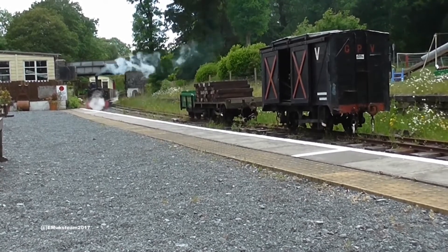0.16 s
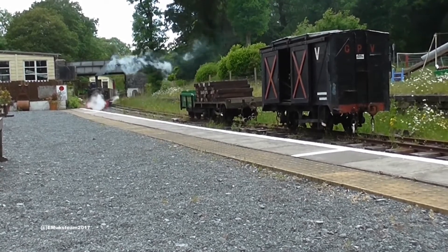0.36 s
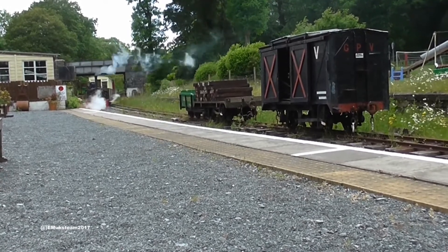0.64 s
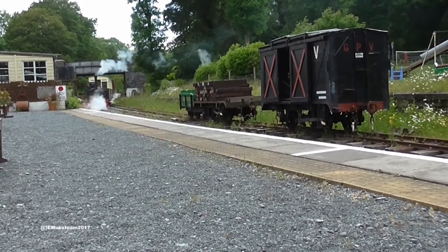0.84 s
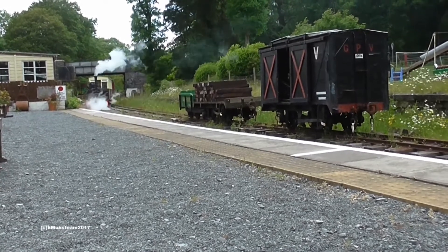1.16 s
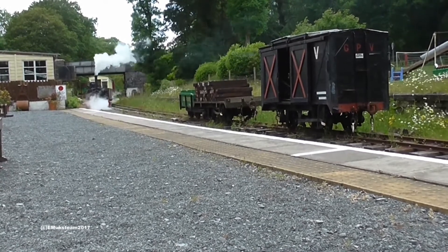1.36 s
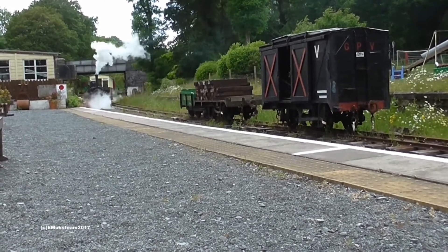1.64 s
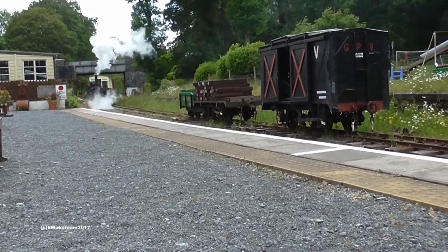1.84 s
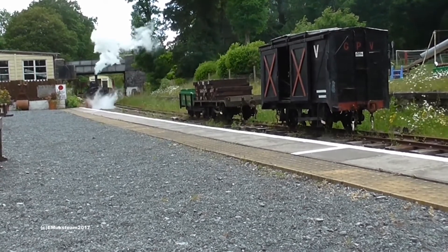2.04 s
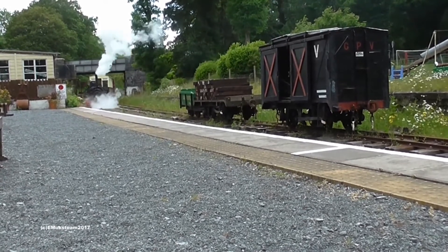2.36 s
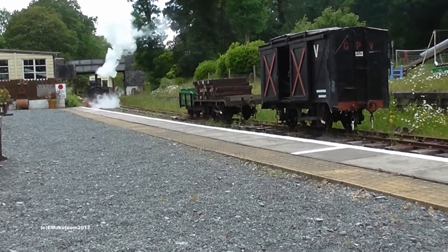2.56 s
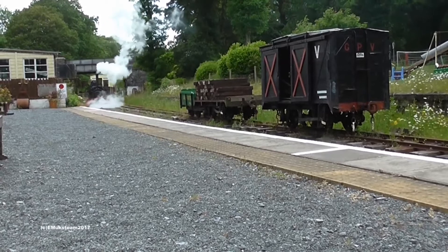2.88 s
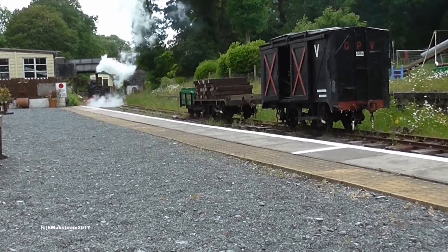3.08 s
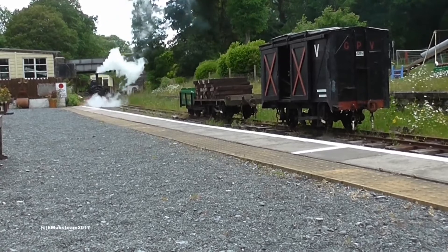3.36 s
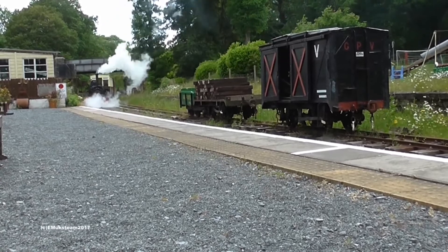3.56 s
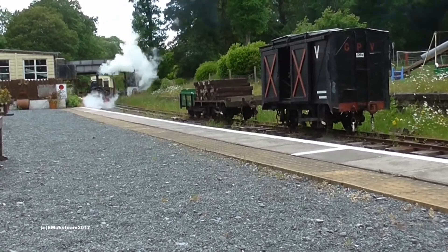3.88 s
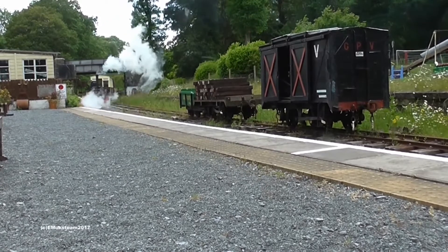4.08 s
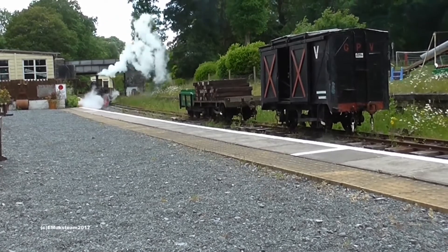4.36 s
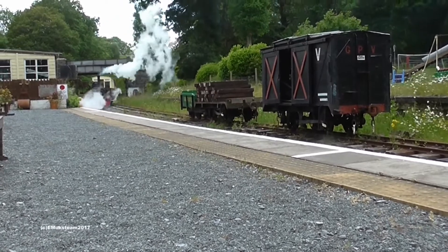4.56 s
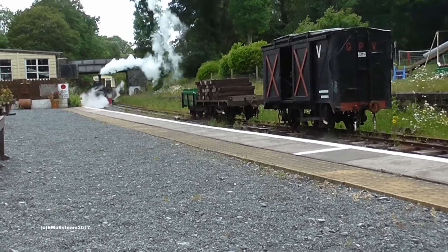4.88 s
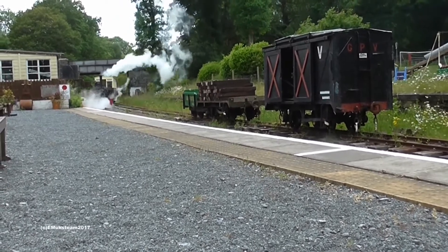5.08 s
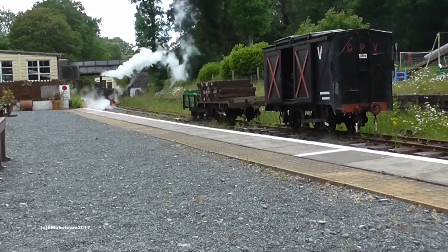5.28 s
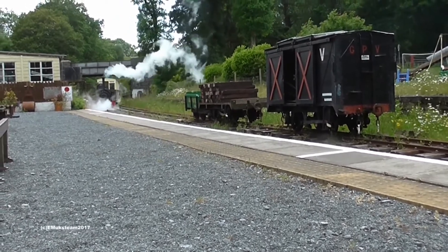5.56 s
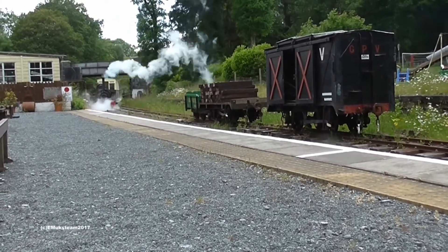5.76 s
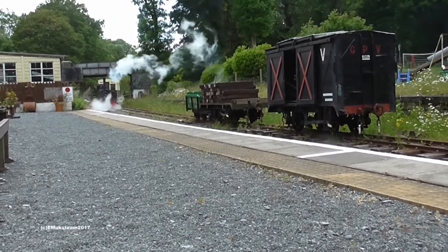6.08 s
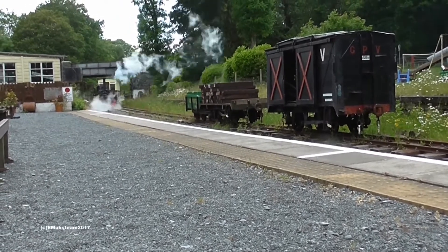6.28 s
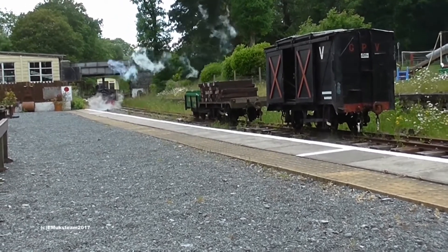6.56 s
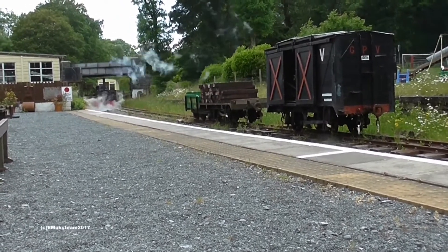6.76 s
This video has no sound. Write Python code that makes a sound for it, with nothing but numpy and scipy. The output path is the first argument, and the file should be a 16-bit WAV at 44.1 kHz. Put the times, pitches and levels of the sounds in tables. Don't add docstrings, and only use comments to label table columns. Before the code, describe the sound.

Heavy wind rumble and sharp buffeting slaps open the scene, uneven between left and right, over a distant steady rush of escaping steam. The wind calms and the hiss stands clearer, shimmering with airy pipe-like tones and a soft chimney drone. Small gusts return before the valve closes around 5.5 seconds; the hiss drops away with a short echo into quiet outdoor air, with a few low wind bumps at the end.

```python
import sys
import numpy as np
from scipy import signal
from scipy.fft import rfft, irfft, next_fast_len
from scipy.io import wavfile
from scipy.ndimage import uniform_filter1d, map_coordinates

SR = 44100
rng = np.random.default_rng(int(sys.argv[2]) if len(sys.argv) > 2 else 0)


def log_audio(samples):
    frames = np.atleast_2d(samples).T
    limited = np.clip(frames, -1, 1)
    pcm = np.round(limited * 32767).astype(np.int16)
    wavfile.write(sys.argv[1], SR, pcm)


def natural_amplitude(level_db):
    exponent = np.asarray(level_db, float) / 20
    return 10 ** exponent


N = 305613
T = np.arange(N) / SR

# time in seconds, level in dB, clearness of the air in dB.
JET_FLOW = [(0.0, -33, 4), (0.07, -30.5, 2), (0.24, -33, 1.5), (0.33, -28.5, -4), (0.86, -31, -3),
            (1.18, -31.5, 1), (1.42, -31, -0.5), (1.46, -30.5, 0), (3.14, -31.5, -3), (3.31, -28.5, -4),
            (3.73, -30.5, -0.5), (3.83, -29, -2.5), (3.91, -31, 4), (4.05, -31, -1), (4.78, -31.5, -0.5),
            (5.1, -30.5, -4), (5.25, -29.5, -4), (5.42, -31.5, -3.5)]
# centre in Hz, width in Hz.
JET_REGIONS = [
    (9500, 4500),
    (5800, 2000),
    (3850, 1250),
    (1300, 650),
]
# dB above its level, share of the clearness,
# echo in dB, sinking of the echo in dB per second.
REGION_RESPONSE = [
    (1, 1.3, 3, 61),
    (0, 0.48, -1.5, 35.5),
    (-4, 0.24, 2, 31),
    (-10.5, 0.034, -1, 16),
]
# frequency in Hz, density in dB per Hz.
NOZZLE_SPECTRUM = [(500, -75), (900, -35.5), (1600, -31.5), (1900, -23.5), (3000, -19.5), (3400, -7.5),
                   (4600, -3.5), (5200, -2.5), (6800, -1.5), (8000, -3.5), (10100, -7.5), (12000, -15),
                   (14200, -23), (15500, -27)]
# frequency in Hz, width in Hz, lift in dB.
PATH_COLOUR = [(3780, 200, 2), (4750, 200, -3), (5450, 400, 3), (7750, 200, -4)]
# time in seconds, fall of the direct sound in dB per second.
VALVE_SHUT = (5.468, 130)

# resonance in Hz, width in Hz.
PIPE_RESONANCES = [(1860, 124), (2185, 195), (2685, 440), (3020, 530)]
PIPE_REST_DB = [-48, -43, -44, -50.5]
# time in seconds, length in seconds, peak in dB.
PIPE_SWELLS = [
    [(.95, 0.33, -40.5), (1.65, 0.15, -40), (1.92, 0.14, -36.5), (2.72, 0.19, -39.5), (3.3, 0.11, -38),
     (3.63, 0.06, -38.5), (4.52, 0.13, -38), (4.96, .12, -38)],
    [(.45, .25, -40.5), (.95, 0.15, -35.5), (1.67, 0.12, -30.5), (2.15, 0.32, -38), (2.5, 0.1, -34.5),
     (3.2, 0.073, -38.5), (3.8, 0.16, -35.5), (4.4, 0.29, -41), (4.8, 0.11, -30)],
    [(.36, 0.17, -37), (.96, 0.052, -42), (1.52, 0.39, -36), (2.03, 0.29, -32.5), (2.72, 0.12, -33),
     (3.4, 0.18, -37), (3.98, 0.25, -35), (4.97, 0.13, -33.5), (5.28, 0.14, -33)],
    [(.27, 0.2, -38.5), (4.08, 0.17, -34), (4.93, 0.14, -32), (5.3, 0.097, -36)],
]
# level in dB, sinking in dB per second.
PIPE_ECHO = (-7, 35)

# time in seconds, centre in Hz, length in seconds,
# width in Hz, lift in dB.
FOCUSED_GLINTS = [(0.105, 6500, 0.12, 904, 2.5), (0.344, 3770, 0.13, 200, 5), (1.385, 5650, 0.061, 250, 11),
                  (1.79, 5000, 0.12, 200, 9), (2.003, 3770, 0.19, 450, 5.5), (3.243, 3680, 0.071, 200, 8),
                  (3.826, 5450, 0.06, 300, 11.5), (3.85, 6200, .06, 300, 9.5), (5.11, 6100, .05, 200, 10),
                  (5.405, 3370, 0.052, 300, 12.5), (.47, 5700, 0.12, 400, -2), (.85, 2300, 0.19, 150, 1.5),
                  (1.45, 6700, 0.25, 300, 4), (3.2, 3100, 0.27, 200, 6), (3.4, 2820, .15, 130, -6),
                  (4.297, 2800, 0.11, 300, 5), (4.506, 2450, .1, 200, 6), (4.9, 2820, .1, 150, -10),
                  (5.56, 3100, 0.088, 600, -4), (4.71, 9000, 0.051, 4000, -5.5)]
# time in seconds, centre in Hz, length in seconds,
# lift in dB, drift in Hz per second.
PATH_RIDGES = [(.08, 8900, .08, 1, 0), (.1, 6250, 0.088, 1.5, -500), (0.123, 6800, .07, 5, 1000),
               (.2, 8600, .05, 11, 0), (.33, 5550, .07, 5, 0), (.6, 6300, 0.14, 4, -500),
               (1.0, 2600, .12, 7, 0), (1.18, 5550, 0.15, 4.5, 0), (1.302, 6700, .1, 3, 0),
               (1.467, 2750, 0.056, 3, 0), (1.603, 7400, 0.063, 6, 300), (1.78, 4450, 0.055, 12, 0),
               (1.82, 2420, .1, 0, 0), (1.93, 5200, 0.055, 8, 0), (1.947, 7550, .05, 16, 0),
               (1.996, 2190, 0.072, 5, 0), (2.1, 3440, 0.17, 6, -300), (2.096, 4250, 0.046, 5, 0),
               (2.2, 2670, 0.13, 2, 0), (2.5, 6500, 0.11, 9, 0), (3.297, 5540, .1, 2.5, 1500),
               (3.62, 5560, 0.048, 8, 0), (3.69, 1980, 0.033, 9, 3000), (3.924, 2650, 0.041, 8, 1000),
               (3.98, 5350, 0.087, 3.5, 500), (4.02, 3520, .04, 8, 0), (4.03, 2970, .08, 4, 1500),
               (4.097, 4170, .05, 7, 0), (4.134, 5340, 0.033, 6, 0), (4.3, 2200, 0.043, 8, 0),
               (4.55, 6900, 0.083, 7, 0), (4.92, 6800, 0.071, 5, 500), (4.97, 2640, .06, 3, 0),
               (5.25, 2650, 0.042, 3, 0), (5.173, 6600, 0.065, 10, 3000), (3.87, 6200, .05, 2, 3000),
               (.93, 2220, 0.034, 8.5, 0), (3.38, 1870, 0.091, -1, 0), (5.38, 3350, .06, -3, 0),
               (4.95, 3050, .08, -4, 0)]
# time in seconds, centre in Hz, length in seconds, lift in dB.
AIR_POCKETS = [(.3, 4800, 0.14, -1), (.5, 9500, 0.093, 2), (1.05, 1050, .12, -5), (1.1, 2450, 0.084, -1),
               (1.4, 1100, 0.091, 3), (1.503, 12000, .1, -2.5), (1.847, 10100, 0.13, 4),
               (1.993, 4330, .13, 1.5), (2.05, 1100, .1, -1), (2.227, 7000, 0.049, -7),
               (2.343, 4030, 0.067, -3.5), (2.4, 1060, 0.22, 4), (2.48, 10000, .09, 3.5),
               (2.7, 1050, 0.088, -2), (2.697, 6200, 0.064, 2.5), (2.747, 3500, 0.12, -1),
               (3.06, 2180, .08, -3), (3.13, 1140, .07, 7), (3.49, 3150, 0.17, -3),
               (3.85, 7200, 0.13, -2.5), (4.093, 5560, 0.089, 2.5), (4.295, 9800, 0.055, 3),
               (4.37, 1000, 0.063, -5), (4.526, 3240, 0.093, 4), (4.58, 1280, .09, 6),
               (4.704, 11000, 0.065, -2), (4.716, 3700, 0.088, -4), (4.86, 8600, 0.077, 2),
               (5.05, 5000, 0.16, -1), (5.3, 1850, 0.17, 3)]
RIDGE_WIDTH_HZ, POCKET_OCTAVES = 113, 0.31

# time in seconds, level in dB.
DRAUGHT = [(0.0, -36.5), (0.38, -30.5), (0.62, -35), (1.32, -33.5), (1.73, -37.5), (1.97, -41), (2.44, -31),
           (2.83, -35.5), (3.2, -30), (3.41, -33), (3.88, -34), (4.24, -35.5), (5.32, -37.5), (5.4, -36)]
# resonance in Hz, width in Hz, level in dB.
CHIMNEY_HOLLOWS = [
    (178.9, 40.6, 0.5),
    (218.3, 24, -8.5),
    (261.5, 22, -19),
]
# time in seconds, level in dB.
UPPER_HOLLOWS = [(0, -2), (1.5, -1.5), (2.1, -6), (2.7, -1.5), (3.1, -3), (3.45, 4), (3.8, 5), (4.3, 5.5),
                 (5.4, 4)]
# level in dB, sinking in dB per second.
CHIMNEY_ECHO = (-15.5, 3)
CHIMNEY_EDGE_HZ = 142

# time in seconds, level in dB.
YARD_LEVEL = [(0, -39), (.8, -37), (1.3, -41), (1.6, -38), (2, -44.5), (2.4, -40.5), (2.8, -42),
              (3.3, -41.5), (3.6, -41), (4, -44.5), (4.7, -39.5), (5.7, -39), (6.3, -38), (6.93, -38)]
# frequency in Hz, density in dB per Hz.
YARD_SPECTRUM = [(15, -40), (60, -6), (200, -8), (400, -3), (750, -0.5), (1130, -7), (1550, -7),
                 (2000, -10), (2800, -22), (3600, -16.5), (5200, -17), (7000, -29), (10000, -35.5),
                 (15500, -45)]

# frequency in Hz, left-right likeness from 0 to 1.
ENGINE_ALIKE = [(200, 1), (640, 0.81), (1400, 1), (2200, 0.98), (2750, 0.84), (3300, 0.97), (3900, 0.95),
                (5000, 0.77), (7000, 0.94), (9500, 0.77), (15000, 0.7)]
# frequency in Hz, left-right likeness from 0 to 1.
YARD_ALIKE = [(300, 0.97), (1400, 0.84), (7000, 0.51), (15000, 0.15)]
# frequency in Hz, left-right difference in dB.
PORT_LEAN = [(200, -3.5), (400, -3.5), (700, -1.5), (1290, -1), (2380, 0.5), (4400, 0.9), (6500, 2),
             (9000, -1.3), (15000, -.6)]

# time in seconds, rumble in dB.
STEADY_BREEZE = [(0, -42), (.2, -29), (1.2, -36.5), (1.27, -60), (3, -52), (4.3, -41), (5.4, -54),
                 (5.8, -59), (6.2, -46), (6.39, -57), (6.5, -37.5), (6.75, -36), (6.84, -50), (6.93, -43)]
BREEZE_FLUTTER_DB, BREEZE_LEAN_DB, GUST_S = 4, -9, 0.059
# time in seconds, rumble in dB, flutter in dB above it, left-right difference in dB.
PORT_GUSTS = [(.12, -34, 11.5, -9), (.27, -22.5, 2.5, -6), (.5, -26.5, -1, -6), (.74, -29, 2, -12),
              (.87, -25.5, 8, -9.5), (1.02, -31, 7.5, -3), (1.17, -22.5, 4, -3), (1.5, -38, -5, -5),
              (1.7, -42, -14, -2), (1.9, -37.5, 0, 1), (2.2, -38, -5, -7), (2.4, -43, 2, -7),
              (2.8, -43, 0, -14), (3.32, -35, 2, -5), (3.52, -44, 8, -4), (3.8, -39, -3, -12),
              (4.05, -41, -1, -6), (4.17, -32.5, 2.5, -10), (4.58, -30.5, -7, -3), (4.82, -38.5, -2, 0),
              (5.01, -33, -3, -3), (5.29, -29, 4.5, -4), (5.47, -35.5, -6, -7), (5.63, -45, -1.1, -6),
              (6.03, -38, -1, -8), (6.17, -37, -0.5, -19), (6.32, -43, 7.5, -11), (6.72, -34, 5, -14),
              (6.79, -34, 1, -7.5), (6.9, -33, 3, -6)]
# frequency in Hz, density in dB per Hz.
RUMBLE_SPECTRUM = [(10, -40), (22, -18), (45, -11), (75, -4), (110, -6), (160, -39), (300, -55),
                   (600, -120)]
# frequency in Hz, density in dB per Hz.
FLUTTER_SPECTRUM = [(70, -36), (120, 3.5), (170, -1.5), (285, -6.5), (430, -12), (700, -29), (1030, -33),
                    (1600, -54), (3000, -120)]

# time in seconds, peak in dB, frequency in Hz,
# length in seconds, left-right difference in dB.
PORT_EDDIES = [(.225, -4, 166, 0.0053, -13), (.255, -3, 177, 0.0057, -19), (0.306, -17, 110, 0.013, -4),
               (.41, -8, 182, 0.0053, -12), (0.478, -9.5, 150, .005, -8), (.585, -16, 151, 0.012, -14),
               (0.656, -25, 90, .012, 2), (.85, -2, 199, 0.0026, -6), (.88, -9, 170, 0.0059, -12),
               (0.902, -4.5, 189, 0.0049, -11), (1.012, -17, 150, 0.0047, 6),
               (1.035, -15.5, 174, 0.017, -8), (1.165, -16, 171, 0.012, -7), (1.88, -26, 199, .012, -12),
               (1.965, -24, 220, 0.0095, -8), (2.215, -36, 180, .012, -2), (2.865, -36, 200, .012, -1),
               (4.59, -24, 139, 0.018, -11), (4.99, -28, 138, 0.026, -19), (5.258, -14.5, 130, 0.0047, -9),
               (6.037, -10.5, 184, 0.0064, -13), (6.725, -10, 160, 0.0042, -7),
               (6.795, -14.5, 200, 0.008, -7), (.157, -12, 185, 0.0063, -15), (.283, -9, 170, 0.0037, -9),
               (.385, -14.5, 193, 0.01, -13), (.62, -20, 170, .008, -14), (.722, -13, 190, .004, -10),
               (.778, -11, 200, 0.0023, -10), (1.052, -10, 200, 0.0039, -14), (1.148, -8, 200, 0.0035, -11),
               (1.19, -8, 190, .005, -9), (1.222, -19, 175, 0.0089, -13), (6.165, -18, 120, .008, -9),
               (6.195, -22, 119.7, 0.0087, -13), (6.685, -14, 170, 0.0063, -12), (6.78, -18, 191, .005, -7),
               (6.815, -18, 170, 0.0066, -7), (6.875, -18, 120, 0.0064, -9), (6.895, -17, 200, .005, -15)]
# frequency in Hz, density in dB per Hz.
PUFF_SPECTRUM = [(15, -30), (30, 7), (100, -13), (300, 10), (500, -1), (900, -16), (1600, -60),
                 (3000, -120)]
# time in seconds, level in dB, length in seconds.
PORT_SLAPS = [(0.247, -17, .008), (.258, -18, .005), (0.411, -25, .005), (.48, -23, .005),
              (0.718, -25, .005), (0.782, -25, .004), (.85, -16.5, .006), (0.907, -22, .005),
              (0.946, -24.5, .01), (1.154, -25, .006), (1.175, -23, .01), (1.188, -22, .005),
              (5.271, -28, .01), (6.723, -27, .005)]
# frequency in Hz, density in dB per Hz.
SLAP_SPECTRUM = [(150, -28), (300, 0), (600, -0.5), (900, -7.5), (1500, -30), (3000, -120)]


def unit(x):
    return x / np.sqrt(np.mean(x ** 2) + 1e-20)


def along(points, hz):
    f, value = np.transpose(points)
    return np.interp(np.log(hz + 1), np.log(f + 1), value)


def curves(rows, t=T):
    s, *columns = np.transpose(rows)
    return np.array([np.interp(t, s, column) for column in columns])


def wobble(rate):
    knots = rng.standard_normal(int(N * rate / SR) + 4)
    return map_coordinates(knots, [np.arange(N) * rate / SR])


def bump(t, s, length):
    return np.exp(-((t - s) / length) ** 2)


def filtered(x, response):
    m = next_fast_len(N + SR // 4)
    hz = np.fft.rfftfreq(m, 1 / SR)
    return irfft(rfft(x, m) * response(hz), m)[..., :N]


def noise(spectrum):
    return unit(filtered(rng.standard_normal((2, N)), lambda hz: natural_amplitude(along(spectrum, hz))))


def steady(x, seconds):
    power = np.abs(uniform_filter1d(x ** 2, round(seconds * SR), axis=-1))
    return x / np.sqrt(power + 1e-6)


def patches(shape, bins, frames):
    field = rng.standard_normal(shape)
    for _ in range(2):
        field = uniform_filter1d(field, bins, axis=0)
        field = uniform_filter1d(field, frames, axis=1)
    return unit(field)


def shut_db(t, echo_db, sink_db):
    shut_s, direct_sink_db = VALVE_SHUT
    after = np.maximum(t - shut_s, 0)
    echo = natural_amplitude(2 * min(echo_db, 0))
    direct_power = (1 - echo) * natural_amplitude(-2 * direct_sink_db * after)
    echo_power = echo * natural_amplitude(-2 * sink_db * after)
    return 10 * np.log10(direct_power + echo_power)


def pipework(hz, t):
    frames = np.minimum(np.round(t * SR).astype(int), N - 1)
    power = 0
    for rest_db, swells, (c, width) in zip(PIPE_REST_DB, PIPE_SWELLS, PIPE_RESONANCES):
        voice = natural_amplitude(2 * rest_db) + sum(natural_amplitude(2 * db) * bump(t, s, length) for s, length, db in swells)
        centre = c * (1 + 0.006 * wobble(3.53)[frames])
        shape = 1 / (1 + (2 * (hz[:, None] - centre) / width) ** 2) ** 2
        power = power + voice * shape / shape.mean(axis=0)
    return power * natural_amplitude(2 * shut_db(t, *PIPE_ECHO))


def moving_air(hz, t):
    shape = (len(hz), len(t))
    ridge_depth_db = np.interp(hz, [3000, 4500], [1.0, 2.0])[:, None]
    path_db = ridge_depth_db * patches(shape, bins=3, frames=12)
    path_db = path_db + 0.8 * patches(shape, bins=14, frames=10)
    path_db = path_db + 0.86 * patches(shape, bins=80, frames=2)
    for s, centre, length, width, db in FOCUSED_GLINTS:
        path_db = path_db + db * np.outer(bump(hz, centre, width), bump(t, s, length))
    for s, start_hz, length, db, drift in PATH_RIDGES:
        ridge = bump(hz[:, None], start_hz + drift * (t - s), RIDGE_WIDTH_HZ)
        path_db = path_db + db * ridge * bump(t, s, length)
    for s, centre, length, db in AIR_POCKETS:
        pocket = bump(np.log2(hz + 1), np.log2(centre), POCKET_OCTAVES)
        path_db = path_db + db * np.outer(pocket, bump(t, s, length))
    return path_db


def jet():
    hz, t, z = signal.stft(rng.standard_normal((2, N)), SR, nperseg=1024)
    colour_db = along(NOZZLE_SPECTRUM, hz)
    for c, width, db in PATH_COLOUR:
        colour_db = colour_db + db / (1 + (2 * (hz - c) / width) ** 2)
    flow_db, clear_db = curves(JET_FLOW, t)
    level_db = []
    for (c, width), (db, clearness, *echo) in zip(JET_REGIONS, REGION_RESPONSE):
        inside = abs(hz - c) < width / 2
        own_db = 10 * np.log10(np.sum(natural_amplitude(2 * colour_db[inside])) / len(hz))
        level_db.append(flow_db + db + clearness * clear_db + shut_db(t, *echo) - own_db)
    centres = np.log(np.transpose(JET_REGIONS)[0, ::-1])
    share = np.array([np.interp(np.log(hz + 1), centres, row[::-1]) for row in np.eye(len(centres))])
    power = natural_amplitude(2 * (colour_db[:, None] + share.T @ np.array(level_db))) + pipework(hz, t)
    hiss = z * np.sqrt(power) * natural_amplitude(moving_air(hz, t))
    return signal.istft(hiss, SR, nperseg=1024)[1][:, :N]


def drone():
    def hollows(hz):
        rings = [natural_amplitude(db) / (1 + (2 * (hz - c) / width) ** 2) for c, width, db in CHIMNEY_HOLLOWS]
        return np.array(rings)[:, None] / np.sqrt(1 + (CHIMNEY_EDGE_HZ / (hz + 1)) ** 12)

    gain_db = curves(DRAUGHT)[0] + shut_db(T, *CHIMNEY_ECHO) + 3.5 + 1.4 * wobble(8.7)
    main, *upper = filtered(rng.standard_normal((2, N)), hollows)
    hollow = unit(main + natural_amplitude(curves(UPPER_HOLLOWS)[0]) * sum(upper))
    return natural_amplitude(gain_db) * steady(hollow, 0.14)


def yard():
    gain_db = curves(YARD_LEVEL)[0] + 3.5 + 0.4 * wobble(3.07)
    return natural_amplitude(gain_db) * noise(YARD_SPECTRUM)


def placed(pair, alike):
    def spread(hz):
        turn = np.arccos(np.clip(along(alike, hz), -1, 1)) / 2
        return np.array([np.cos(turn), np.sin(turn)])

    mid, side = filtered(pair, spread)
    ports = np.array([mid + side, mid - side])
    return filtered(ports, lambda hz: natural_amplitude(np.outer([.5, -.5], along(PORT_LEAN, hz))))


def wind():
    side = np.array([[.4], [-.4]])
    rows = [(natural_amplitude(2 * curves(STEADY_BREEZE)[0]), BREEZE_FLUTTER_DB, BREEZE_LEAN_DB)]
    for s, db, flutter_db, lean_db in PORT_GUSTS:
        rows.append((natural_amplitude(2 * db) * bump(T, s, GUST_S), flutter_db, lean_db))
    low = np.sqrt(sum(power * natural_amplitude(2 * side * lean_db) for power, _, lean_db in rows))
    high = np.sqrt(sum(power * natural_amplitude(2 * (side * lean_db + flutter_db)) for power, flutter_db, lean_db in rows))
    lumps_db = np.array([2.0 * wobble(35), 1.5 * wobble(35)]) + 2.4 * wobble(28)
    lumps = natural_amplitude(-2.5) * unit(natural_amplitude(lumps_db))
    rumble = lumps * low * steady(noise(RUMBLE_SPECTRUM), 0.21)
    flutter = lumps * high * steady(noise(FLUTTER_SPECTRUM), 0.079)
    return rumble - 0.13 * rumble[::-1] + flutter - 0.2 * flutter[::-1]


def eddies():
    out = np.zeros((2, N))
    puff = noise(PUFF_SPECTRUM)[0]
    phases = rng.uniform(0, 2 * np.pi, len(PORT_EDDIES))
    for (s, db, hz, length, lean_db), phase in zip(PORT_EDDIES, phases):
        near = slice(round((s - .1) * SR), round((s + .1) * SR))
        swing = np.cos(2 * np.pi * hz * (T[near] - s) + phase) + natural_amplitude(-10.5) * puff[near]
        out[:, near] += np.outer([-natural_amplitude(db + lean_db), natural_amplitude(db)], swing * bump(T[near], s, length))
    return out


def slaps():
    gate = sum(natural_amplitude(db) * bump(T, s, length) for s, db, length in PORT_SLAPS)
    return np.outer([-natural_amplitude(-10.0), 1], gate * steady(noise(SLAP_SPECTRUM)[0], .01))


def scene():
    engine = placed(jet() + drone(), ENGINE_ALIKE)
    surroundings = placed(yard(), YARD_ALIKE)
    return engine + surroundings + wind() + eddies() + slaps()


def band_limit(x):
    return signal.sosfilt(signal.butter(12, 15140, fs=SR, output="sos"), x)


def record(dry):
    held = dry / (1 + np.abs(dry / .8) ** 4) ** (1 / 4)
    return band_limit(held)


dry = scene()
out = record(dry)
log_audio(out)
```